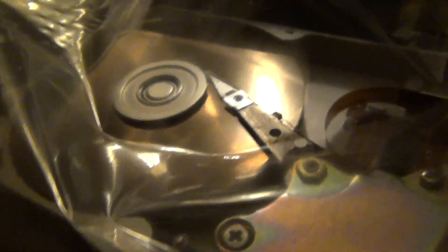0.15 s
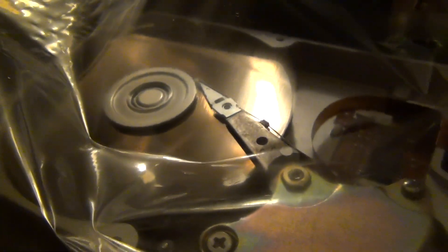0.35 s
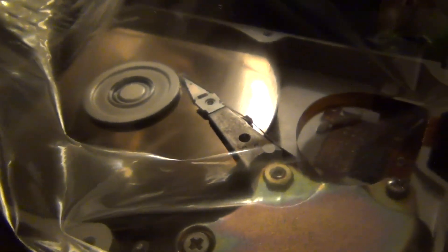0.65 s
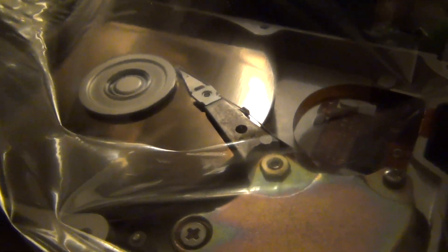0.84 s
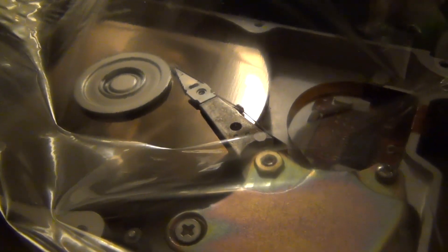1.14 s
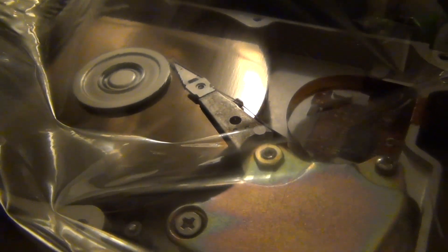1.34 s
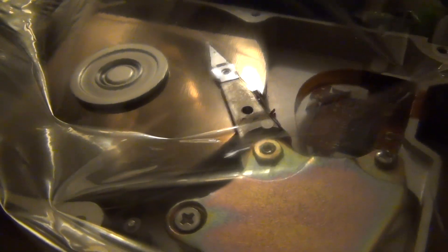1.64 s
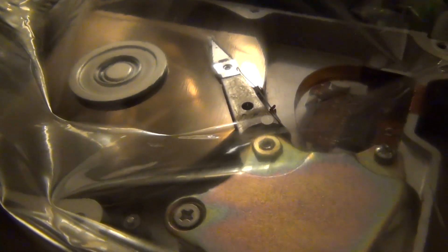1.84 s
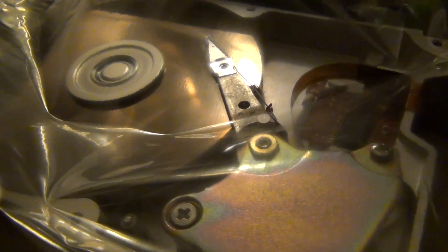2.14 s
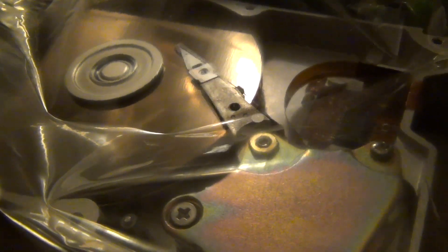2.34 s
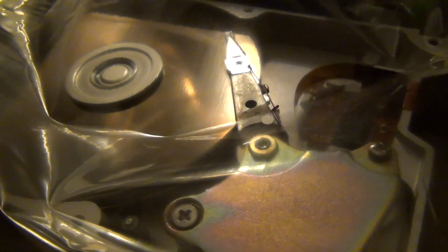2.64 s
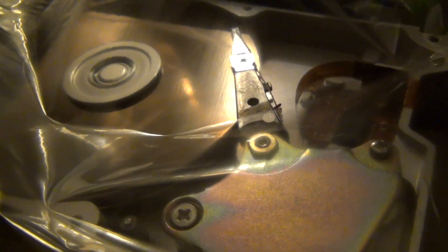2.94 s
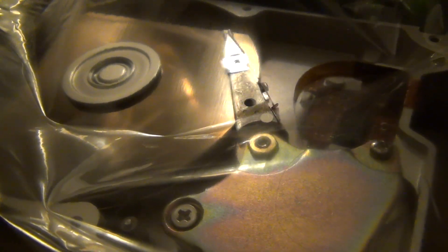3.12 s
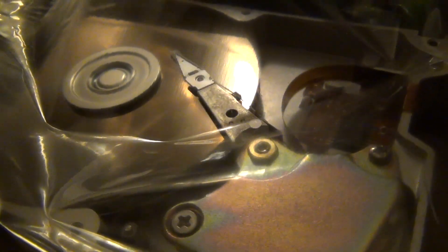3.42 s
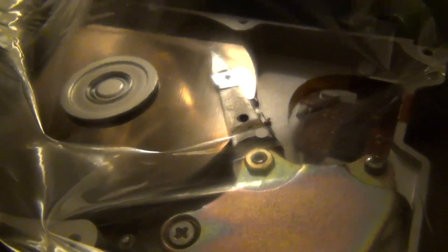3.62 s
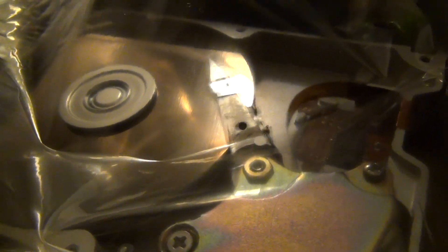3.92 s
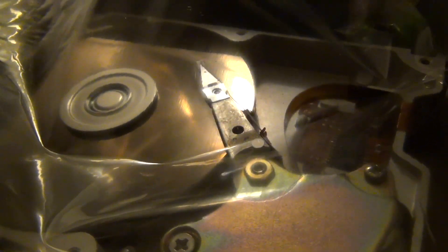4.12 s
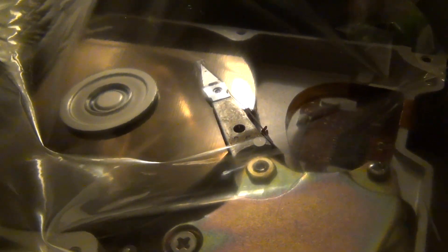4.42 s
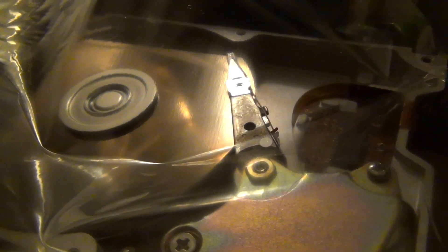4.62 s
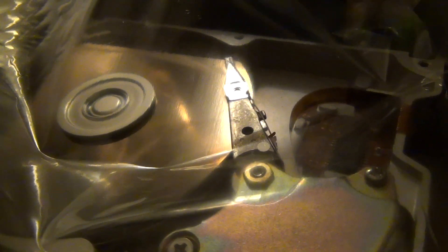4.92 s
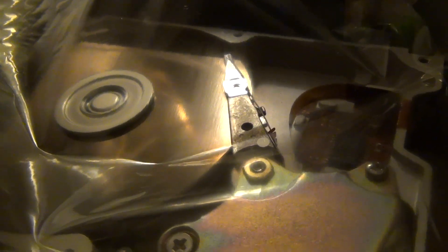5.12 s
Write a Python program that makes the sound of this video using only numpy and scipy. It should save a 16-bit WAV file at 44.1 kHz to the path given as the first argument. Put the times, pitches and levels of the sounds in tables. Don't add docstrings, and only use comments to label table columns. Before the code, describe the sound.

A failing disk drive heard from a hand's width. First a steady, gritty, metallic buzzing scrape with high whine, lightly interrupted by foil taps and soft thuds. After a second and a half the head lifts, and the arm clicks irregularly across the disk with short hissy touches. A shrill beating screech bursts out with sharp scratches, rings on, then one more tick leaves hiss and faint motor tones.

```python
import sys
import numpy as np
from scipy import signal
from scipy.fft import rfft, irfft
from scipy.io import wavfile
from scipy.ndimage import uniform_filter1d

SR = 44100
rng = np.random.default_rng(int(sys.argv[2]) if len(sys.argv) > 2 else 0)


def wrap_up_sound(samples):
    columns = np.atleast_2d(samples).T
    tamed = np.clip(columns, -1, 1)
    steps = np.round(tamed * 32767).astype(np.int16)
    wavfile.write(sys.argv[1], SR, steps)


def ratio(d):
    e = np.asarray(d, float) / 20
    return 10 ** e


N = 232218
T, HZ = np.arange(N) / SR, np.arange(N // 2 + 1) * SR / N
TURN_HZ, SCRATCH_S = 61.055, .5092
TURNS = (T - SCRATCH_S) * TURN_HZ


def unit(x):
    return x / np.sqrt(np.mean(x ** 2))


def noise():
    return rng.standard_normal(N)


def along(table):
    hz, value = np.transpose(table)
    return np.interp(np.log(HZ + 1), np.log(hz), value)


def gains(curve):
    return ratio(np.interp(T, *np.transpose(curve)))


def resonate(x, modes, rest=0):
    response = rest
    for k, (hz, width_hz, db) in enumerate(modes):
        response = response + (-1) ** k * ratio(db) / (1 + 2j * (HZ - hz) / width_hz)
    return irfft(rfft(x) * response, N)


def band(x, lo_hz, hi_hz):
    return unit(signal.sosfilt(signal.butter(4, [lo_hz, hi_hz], "band", fs=SR, output="sos"), x))


def walk(rate_hz):
    k = int(SR / rate_hz)
    held = np.repeat(rng.standard_normal(N // k + 1), k)
    return uniform_filter1d(uniform_filter1d(held, k), k)[:N]


def tone(hz, wander_db, rate_hz, slip_rad):
    level = np.sqrt(2) * ratio(wander_db * walk(rate_hz))
    phase = 2 * np.pi * np.cumsum(hz + 0 * T) / SR
    return level * np.sin(phase + slip_rad * walk(rate_hz) + 9 * rng.random())


def tones(table, wander_db, rate_hz, slip_rad):
    return sum(ratio(db) * tone(hz, wander_db, rate_hz, slip_rad) for hz, db in table)


def bell(peak_s, width_s):
    return np.exp(-((T - peak_s) / width_s) ** 2)


def stroke(s, end_s, db, slope_db_s, rise_s=0.0034, fall_s=0.0066):
    on = np.clip(np.minimum((T - s) / rise_s, 1 + (end_s - T) / fall_s), 0, 1)
    return on ** 2 * ratio(db + slope_db_s * np.clip(T - s, 0, end_s - s))


def add(out, s, modes, swell_s):
    i = int(s * SR)
    t = T[:min(N - i, SR // 5)]
    swell = 1 - np.exp(-(t / swell_s) ** 2)
    for hz, db, t60 in modes:
        phase = 2 * np.pi * rng.random()
        out[i:i + len(t)] += ratio(db - 60 * t / t60) * swell * np.sin(2 * np.pi * hz * t + phase)


# freq_hz, level_db (per Hz)
AIR = [(21, -49), (35, -24.5), (123, -15), (408, -17.5), (598, -16), (734, -16.5), (1710, -9.5),
       (2150, -12.5), (2620, -8), (2850, -4.5), (4510, -9.5), (5000, -4), (5500, -18), (8770, -21),
       (10500, -14), (12000, -18.5), (12450, -25), (12900, -20), (13700, -24), (14100, -31), (14500, -23),
       (15800, -23.5)]
# freq_hz, width_hz, level_db
AIR_MODES = [(2920, 100, -0.5), (3357, 114, -6), (3700, 22, -26), (4236, 72, -9.5), (4970, 37, -2.5),
             (7100, 93, -18), (7990, 19, -11.5), (8350, 75, -12), (9400, 60, -10), (10320, 89, -11.5),
             (10250, 23, -8), (11295, 49, -14), (11400, 56, -8), (11000, 80, -13.5)]


def air():
    ring = band(resonate(noise(), AIR_MODES), 2580, 11700)
    hiss = unit(irfft(rfft(noise()) * ratio(along(AIR)), N))
    return ratio(-35.5 + 1.15 * walk(22)) * ring + ratio(-34.5) * hiss


# pitch_hz, level_db
SPINDLE = [(1663, -53.5), (2735, -49.5), (2885, -45.5), (2961, -44.5), (3106, -55), (3138, -45.5),
           (3176, -63), (3289, -44), (3418, -46), (3542, -48.5), (3612, -53), (3688, -46.5), (3892, -53),
           (4118, -57), (4883, -48.5), (4953, -47), (5076, -48), (6412, -79), (6670, -59), (6928, -56.5),
           (8070, -60), (8312, -55), (9453, -57), (10255, -74), (10524, -48.5), (11052, -68), (12790, -62)]
# pitch_hz, level_db
HUM = [(60, -61), (120, -60), (490, -83), (592, -60), (612, -67)]


def spindle():
    return tones(SPINDLE, 1.8, 9, 0.6) + tones(HUM, 0.98, 5.85, 0.41)


# time_s, level_db
WHINE = [(0, -46), (1.1, -36), (1.56, -35), (1.6, -25), (2.1, -27), (2.35, -39), (3.4, -44), (4.5, -49),
         (5.27, -54)]


def whine():
    rung = unit(resonate(noise(), [(4810, 8.7, 16), (4890, 11, 3.0), (5190, 40, -11.0), (4300, 18, -22.0)]))
    lines = 0.79 * tone(4952, 0.91, 10.4, 0.43) + 0.29 * tone(4968, 1.1, 7.0, 0.58)
    return gains(WHINE) * ratio(-8.0) * (0.37 * rung + lines)


# start_s, peak_db, t60_s, low_mode_weight_db
BUMPS = [
    (0.762, -20, 0.045, 4),
    (0.771, -22.5, 0.12, 3),
    (1.008, -22, 0.041, 0),
    (1.012, -29.5, 0.19, -12),
]
# pitch_hz, level_db, share of the t60
TABLE_MODES = [(109, -10, 0.53), (135, 1, 0.7), (164, 4, 0.38), (208, -1, 1.28), (297, 0.5, 0.39)]


def bumps():
    out = np.zeros(N)
    for s, db, t60, low_db in BUMPS:
        add(out, s, [(f, db + d + low_db * (f < 180), t60 * share) for f, d, share in TABLE_MODES], .006)
    return signal.sosfilt(signal.butter(3, 85, "high", fs=SR, output="sos"), out)


# start_s, peak_db, pitch_hz
TAPS = [
    (.2415, -27, 1900),
    (.272, -25.5, 1100),
]


def taps():
    out = np.zeros(N)
    for s, db, hz in TAPS:
        peak_s = s + .001
        out += ratio(db) * bell(peak_s, 0.00058) * np.cos(2 * np.pi * hz * (T - peak_s))
    return out


HUNT_S, HUNT_RISE_S, SQUEAL_END_S = 3.488, 0.0081, 4.02
RING_END_S, LAST_SEEK_S, PARKED_S = 4.475, 4.495, 4.1


def hunting():
    return stroke(HUNT_S, SQUEAL_END_S - .012, 0, 0, HUNT_RISE_S, 0.025)


# pitch_hz, level_db
PARKED = [(3176, -54), (4883, -60), (8339, -56), (9485, -51)]


def locked_servo():
    left = stroke(3.98, LAST_SEEK_S, -37, 5)
    left += stroke(LAST_SEEK_S, N / SR, -31, -6.5)
    return left * tone(3010, 0.41, 17, 0.13) + (T > PARKED_S) * tones(PARKED, 1.5, 8.6, 0.37)


# freq_hz, width_hz, level_db
BUZZ_MODES = [(1156, 140, -9.5), (1427, 30, -6), (1514, 50, -7), (1797, 34, -0.5), (2000, 31, -3)]
# pitch_hz, level_db
CASE_LINES = [(1389, -49), (1412, -51), (1548, -50), (1707, -58), (1765, -55), (1822, -44.5), (1986, -57),
              (3478, -42), (5023, -47)]


def case_buzz():
    buzz = band(resonate(noise(), BUZZ_MODES), 890, 2270) + 0.49 * tone(1798, 0.88, 17, 0.55)
    bright = band(resonate(noise(), [(6450, 120, 0), (5900, 300, -7), (8700, 600, -9)]), 5300, 9800)
    return hunting() * (ratio(-38.5) * buzz + tones(CASE_LINES, 1.8, 13, 0.51) + ratio(-46) * bright)


# freq_hz, width_hz, level_db
SUSPENSION_MODES = [(1995, 64, -9), (2460, 53, -9), (3910, 180, -7.5), (4100, 70, -14), (4090, 180, -7.5),
                    (5640, 78, -12), (6490, 130, -17), (8630, 390, -17), (10280, 210, -8),
                    (10740, 420, -19), (12900, 570, -27)]
# pitch_hz, level_db
SPRING_LINES = [(1981, -59), (2503, -59), (4317, -48), (5668, -54), (6449, -65)]


def suspension():
    spring = band(resonate(noise(), SUSPENSION_MODES), 1600, 17000)
    spring += 0.55 * unit(resonate(resonate(noise(), [(3925, 75, 0)]), [(3925, 110, 0)]))
    spring += 1.05 * tone(3921, 1.0, 20, .4)
    ring = stroke(HUNT_S, RING_END_S, 0, 0.5, 2 * HUNT_RISE_S)
    return ring * (ratio(-32.5 - 1.5) * spring + tones(SPRING_LINES, 1.6, 8.6, .45))


# pitch_hz (mid hunt), level_db, glide_hz_per_s, grows_db_per_s
SQUEAL = [(2805, -47, 0, 0), (2835, -46, 0, 0), (2902, -31, 20, -4), (2948, -30, -50, 14),
          (2974, -37, 0, 12), (3007, -37.5, 0, 18), (3078, -31, -28, 8), (3141, -38.5, -5, 8),
          (3208, -50, 0, 0), (3273, -44, 25, 8)]


def squeal():
    late = np.clip(T - (HUNT_S + SQUEAL_END_S) / 2, -.3, .3)
    lines = sum(ratio(db + 26 + grows * late) * tone(hz + glide * late, .8, 14, .2)
                for hz, db, glide, grows in SQUEAL)
    rasp = unit(resonate(noise(), [(2870, 52, 0)]))
    return hunting() * ratio(-23 - (T - HUNT_S)) * (0.95 * lines + 0.28 * rasp)


# turns after the first, peak_db
NICKS = [(0, -8.5), (2, -33), (4, -24), (5, -14), (7, -23), (10, -20.5), (12, -15), (14, -10), (16, -10),
         (18, -11), (20, -11), (23, -16.5), (25, -11), (27, -9.5), (29, -16)]
# start_s, peak_db
SNAGS = [(1.2356, -13), (1.2678, -13), (1.312, -14), (1.401, -18), (1.454, -17), (1.488, -17.5),
         (1.5136, -18), (1.5371, -16.5), (1.5635, -17), (1.57, -15), (1.636, -18), (1.6748, -18)]
# pitch_hz, level_db, t60_s
NICK_MODES = [(10200, -5, 0.027), (10830, 6, 0.012), (11010, 1.5, 0.024), (11500, -17, .012)]
# pitch_hz, level_db, t60_s
NICK_UPPER = [(13100, 7.5, 0.022), (13700, -4, .012), (14700, -6, 0.017), (15300, -10, .01)]
FIRST_NICK_S = 3.4946


def nicks():
    out, spit = np.zeros(N), np.zeros(N)
    hits = [(FIRST_NICK_S + round(turns) / TURN_HZ, db) for turns, db in NICKS]
    for s, db in hits + list(SNAGS):
        add(out, s, [(f, db + d - 3.0, t60) for f, d, t60 in NICK_MODES], .0008)
        add(out, s, [(f, -26 + 0.3 * db + d, t60) for f, d, t60 in NICK_UPPER], .0008)
        spit += ratio(-25 + .6 * db) * bell(s + 0.0018, 0.0036)
    return out + spit * band(noise(), 11900, 15100)


# start_s, peak_db, pitch_hz, case_knock_db
TICKS = [(1.649, -23.5, 2920, -45), (1.689, -14, 2974, -41), (2.2184, -25, 2950, -50),
         (2.229, -16.5, 2960, -43), (2.236, -19, 2950, -40), (2.246, -10, 2940, -39),
         (2.255, -23, 2950, -50), (2.389, -21, 3000, -45), (2.384, -21, 3040, -33.5),
         (2.394, -20.5, 3030, -40), (2.54, -21, 3020, -40), (2.544, -23, 2980, -45),
         (2.551, -17.5, 2960, -41), (2.702, -20, 3050, -30), (2.7089, -21, 2930, -45),
         (2.8625, -8, 2940, -32), (3.014, -20, 2970, -30.5), (3.0206, -18, 3020, -42),
         (3.17, -25, 2990, -36.5), (3.183, -19, 2980, -41), (3.1925, -18.5, 2940, -45),
         (3.3305, -19.5, 3000, -41), (3.3361, -22.5, 2900, -34), (3.474, -23, 2950, -45),
         (3.486, -16.5, 2970, -39), (4.503, -16, 2920, -43), (4.492, -14.5, 3000, -32.5),
         (4.597, -38, 2870, -35)]
# pitch_hz, level_db, t60_s
CASE_MODES = [(1113, 0, 0.039), (1402, 3, 0.095), (1500, -2, 0.04), (1800, 4.5, 0.12), (2018, 4, 0.047),
              (3300, -6, .02), (3943, 12, 0.05)]


def ticks():
    out, rasp = np.zeros(N), np.zeros(N)
    for s, db, hz, knock_db in TICKS:
        out += ratio(db + 2.0) * bell(s + .0025, .0032) * np.sin(2 * np.pi * hz * T)
        add(out, s, [(f, knock_db + d - 3.0, t60) for f, d, t60 in CASE_MODES], .003)
        rasp += ratio(knock_db - 2.0) * bell(s + .004, 0.0071)
    return out + rasp * band(noise(), 890, 5200)


def track(memory, fresh, blow, scratch_db, second_db, sharp, wear_db):
    cells = int(SR / TURN_HZ)
    chance = rng.standard_normal((N // cells + 2, cells))
    worn = signal.lfilter([np.sqrt(1 - memory ** 2)], [1, -memory], chance, axis=0, zi=chance[-1:])[0]
    worn[:, int(SCRATCH_S * TURN_HZ % 1 * cells) + 20] += blow * ratio(.9 * chance[:, 0])
    worn = signal.resample(worn.ravel(), int(worn.size * SR / TURN_HZ / cells))[:N]
    scratches = scratch_db * np.exp(-(TURNS % 1 / sharp) ** 2)
    scratches += second_db * np.exp(-((TURNS - .33) % 1 / sharp) ** 2)
    return ratio(scratches + wear_db * walk(70)) * (worn + fresh * noise())


# start_s, end_s, landing_db, glide_db
SKIM = [
    (1.635, 1.713, -22, -33.5),
    (2.217, 2.52, -50, -26),
    (3.176, 3.31, -34, -30.5),
    (3.325, 3.49, -33, -31),
]
# freq_hz, width_hz, level_db
SKIM_MODES = [(10510, 240, 9.5), (11100, 170, 9.5), (11050, 150, 4.5), (11400, 130, -6.5), (11430, 170, -2),
              (12800, 120, -1), (13200, 100, -7), (13800, 80, -2), (14300, 90, -1), (15000, 100, -10),
              (15600, 250, -28)]


def skim():
    scrape = band(resonate(track(0.93, 0.5, 2.7, 9, 3, 0.13, 0.64), SKIM_MODES, ratio(-14)), 8900, 17000)
    touch, land_s = 0, 0.0061
    for s, end_s, land_db, db in SKIM:
        touch = touch + stroke(s, s + land_s, land_db, 0, land_s, 0.023)
        touch += stroke(s, end_s, db, -16, land_s, 0.068)
    whistle = stroke(2.228, 2.4, -27, -55, 0.036) * tone(10270, .8, 40.2, .3)
    return touch * scrape * ratio(-1.5) + whistle


# place in the turn (0-1), pitch_hz, peak_db, fade_db_per_s, length_s
STRIKES = [(.17, 2960, -20.5, -9, .0032), (.15, 3695, -19.5, -10, .0021), (.02, 4365, -25.5, -9, .0015),
           (.3, 4300, -29, -3, .0018), (.15, 4335, -30, 4, .0018), (.42, 4050, -29, -9, .0016),
           (0, 4030, -31, 0, .002), (.19, 4950, -37, 11, .002), (.19, 5953, -22.5, -13, .0028),
           (.5, 5953, -26.5, -15, .0024), (.92, 6045, -37, 10, .004), (.42, 8000, -31, 0, .0013),
           (.08, 11100, -23.5, 0, .0009), (.41, 11350, -21.5, 0, .0014), (.84, 11150, -33, 14, .0013),
           (.4, 12850, -21.5, -18, .001), (.1, 12790, -28, 4, .002), (.84, 12760, -34, 9, .0014),
           (.4, 13320, -25, -16, .0009), (.36, 9700, -38, 11, .0005)]


def strikes():
    out, wearing_s = np.zeros(N), np.clip(T - .55, 0, None)
    for place, hz, db, fade_db_s, length_s in STRIKES:
        t = ((TURNS - place + .5) % 1 - .5) / TURN_HZ
        size = ratio(db + fade_db_s * wearing_s + hz / 4500 * walk(TURN_HZ)) * np.exp(-(t / length_s) ** 2)
        out += size * np.sin(2 * np.pi * hz * (t + place / TURN_HZ) + 0.3 * walk(14.14))
    return out


# multiple of the turn rate, level_db, fade_db_per_s
SING = [(93.2, -53, 6), (96.2, -50, 0), (98.2, -43, -8), (101, -40, -8), (104.7, -43, -8), (109, -53, -6),
        (110, -44, -7), (164, -48, -2), (181.4, -57, -8), (188, -37, -14), (209, -45, -6), (213.6, -42, -3)]


def sing():
    damped = 1 - .75 * np.exp(-(((TURNS + .6) % 1 - .5) / .12) ** 2)
    return damped * sum(ratio(db + 2.5 + fade_db_s * T) * tone(round(turns) * TURN_HZ, 2.1, 7.1, 0.12)
                        for turns, db, fade_db_s in SING)


# freq_hz, width_hz, level_db
RUB_MODES = [(2950, 120, -9.5), (3420, 230, -9.5), (3640, 230, -11), (3820, 200, -8.5), (4060, 84, -3),
             (4450, 190, -5.5), (4980, 71, -7.5), (5990, 110, -8), (6296, 79, -10), (6360, 240, -8),
             (6710, 35, -6), (7130, 1200, -18.5), (8060, 150, -8), (8700, 470, -14), (9500, 110, -17),
             (9920, 67, -4), (10200, 150, -24), (11000, 200, -15), (11040, 190, -1.5), (11900, 37, -6),
             (11860, 350, -11), (12800, 130, -4.5), (13300, 170, -10), (13600, 250, -12), (14000, 200, -10),
             (14300, 200, -12), (14800, 360, -11), (15400, 400, -5)]
# freq_hz, level_db (per Hz)
RUB_BODY = [(1290, -54), (2200, -49), (2970, -8), (5440, -2.5), (6010, 3), (7030, -15), (11200, -2),
            (16000, -22)]
# time_s, level_db
PRESSURE = [(0, -28.5), (.46, -24), (.86, -24.5), (.98, -26.5), (1.32, -25.5), (1.58, -26)]
LIFT_S, LIFT_FADE_S = 1.578, 0.0041


def rub():
    def ring(*wear):
        return resonate(track(*wear), RUB_MODES, ratio(along(RUB_BODY) - 15.0))

    arm = ratio(-3 - 1.5 * T) * band(ring(0.96, 0.45, 1.0, 4.0, 2.5, 0.22, 0.6), 2640, 5380)
    platter = ratio(-4.5 - 2.0 * T) * band(ring(0.875, 1.0, 1.0, 5.0, 8.3, 0.12, 0.99), 4370, 9300)
    head = ratio(-2) * band(ring(0.89, 0.97, 1.5, 9.9, 6.5, 0.16, 0.52), 8700, 15140)
    scrape = gains(PRESSURE) * ratio(-0.5) * (arm + platter + head)
    contact = np.clip(1 + (LIFT_S - T) / LIFT_FADE_S, 0, 1)
    tail = ratio(-13 - 60 * np.clip(T - LIFT_S, 0, None) / 0.37)
    return np.maximum(contact, tail) * (scrape + strikes() + sing())


# freq_hz, left_minus_right_db
LEAN = [(100, 0), (300, 0.8), (700, -2), (1400, 1.4), (2200, 3), (3000, -2.5), (3600, -2.5), (5000, 2),
        (8000, -4.5), (11000, -0.5), (13500, -2.5)]
# freq_hz, left_lead_rad
LEAD = [(0, 0), (2930, -0.023), (3450, -0.97), (3700, 0.099), (4000, 0.011), (6500, 0.14), (7400, 0.72),
        (8440, 0.17), (8700, -0.1), (9040, 0.59), (10900, -0.19), (11200, -0.24), (12700, 0.016),
        (13100, -0.2), (13400, 0.1), (14800, -0.0), (16500, 0.0)]
# freq_hz, side_minus_mid_db
WIDTH = [(60, -36), (150, -36), (350, -17), (700, -17), (1300, -45), (2000, -28), (2900, -21.5),
         (4500, -22), (6000, -39), (7500, -13), (10500, -12), (13000, -6), (15500, -42)]


def scene():
    mid = air() + spindle() + whine() + bumps() + taps()
    mid += locked_servo() + case_buzz() + suspension() + squeal()
    mid += nicks() + ticks() + skim() + rub()
    port = ratio(along(LEAN) / 2) * np.exp(.5j * along(LEAD))
    echo = rng.standard_normal(SR // 4) * ratio(-60 * T[:SR // 4] / 0.12)
    echo /= np.linalg.norm(echo)
    side = irfft(rfft(mid) * rfft(echo, N) * ratio(along(WIDTH)), N)
    side += ratio(-71.5) * band(noise(), 260, 970)
    return np.array([irfft(rfft(mid) * port, N) + side, irfft(rfft(mid) / port, N) - side])


def roll_off(x):
    return signal.sosfilt(signal.butter(12, 16860, fs=SR, output="sos"), x)


def record(dry):
    mix = signal.sosfilt(signal.ellip(12, .2, 70, 15720, fs=SR, output="sos"), dry)
    return roll_off(mix)


dry = scene()
out = record(dry)
wrap_up_sound(out)
```